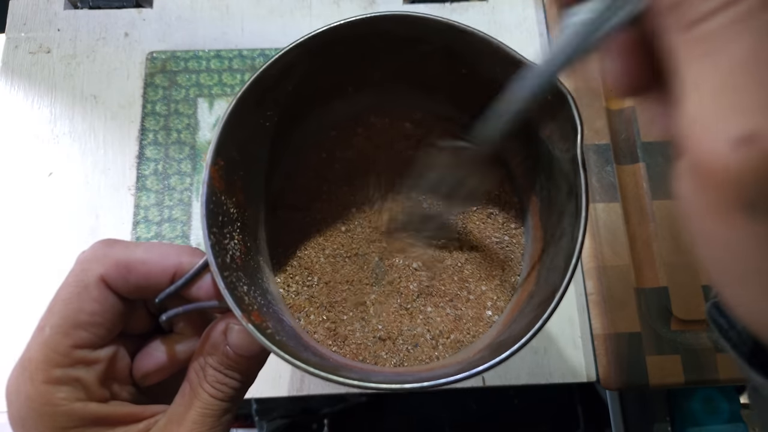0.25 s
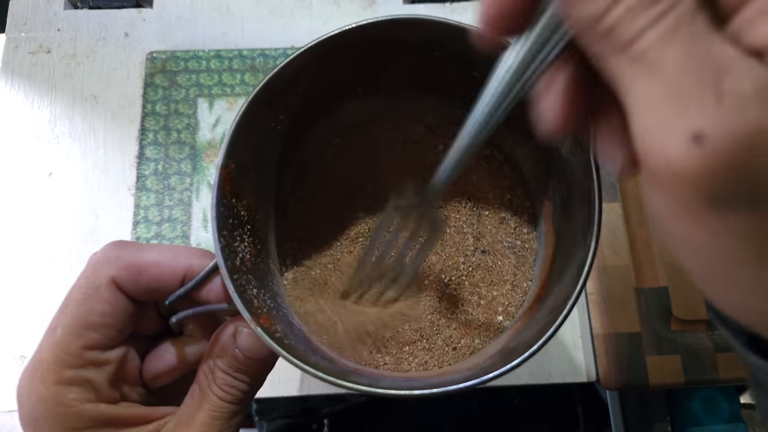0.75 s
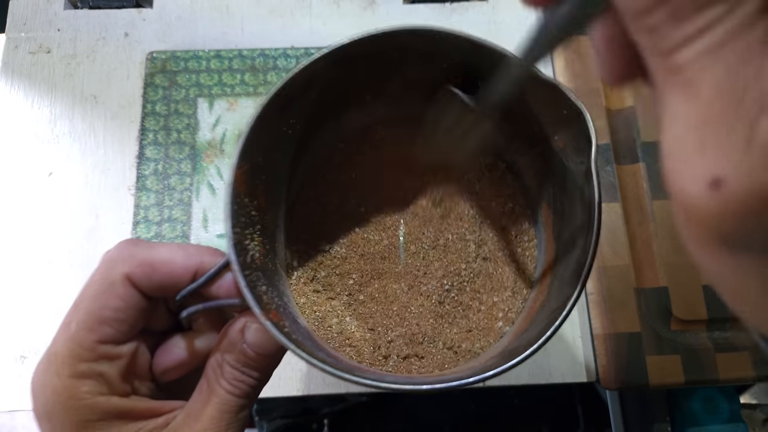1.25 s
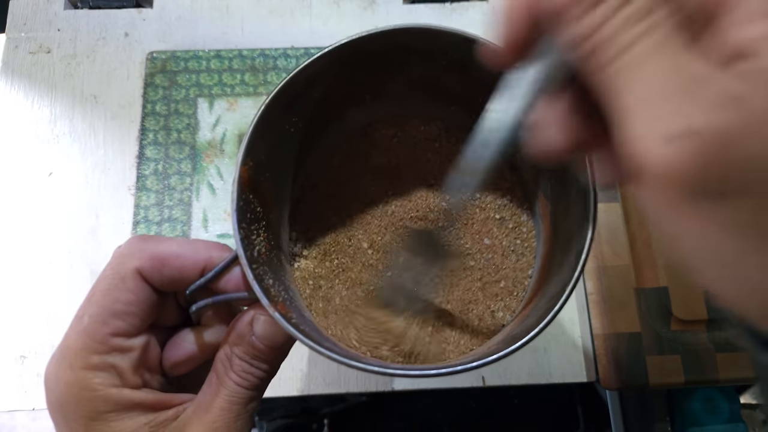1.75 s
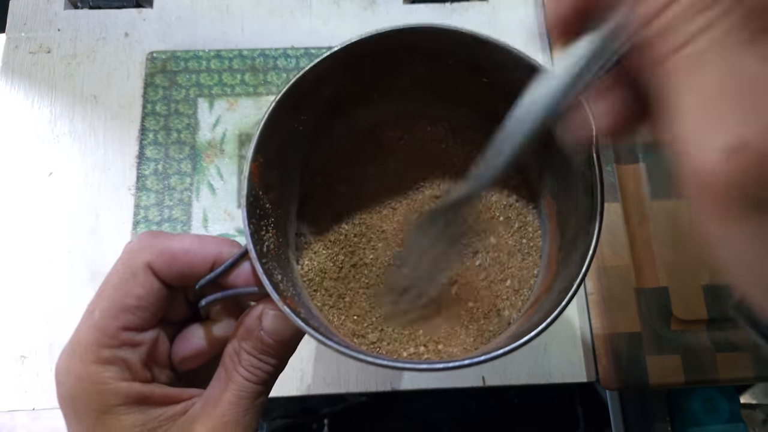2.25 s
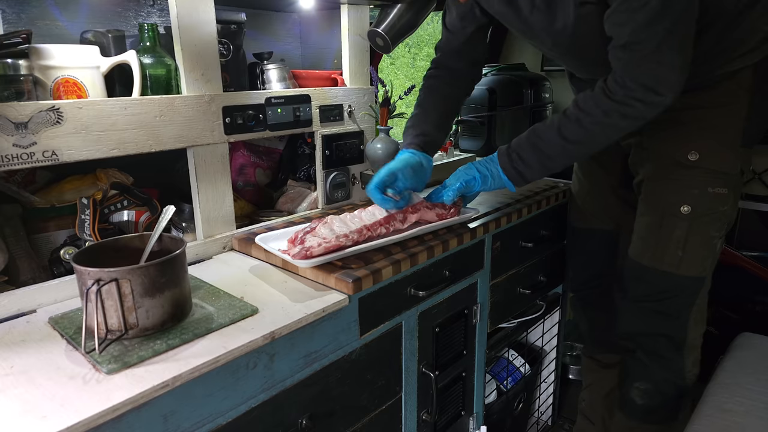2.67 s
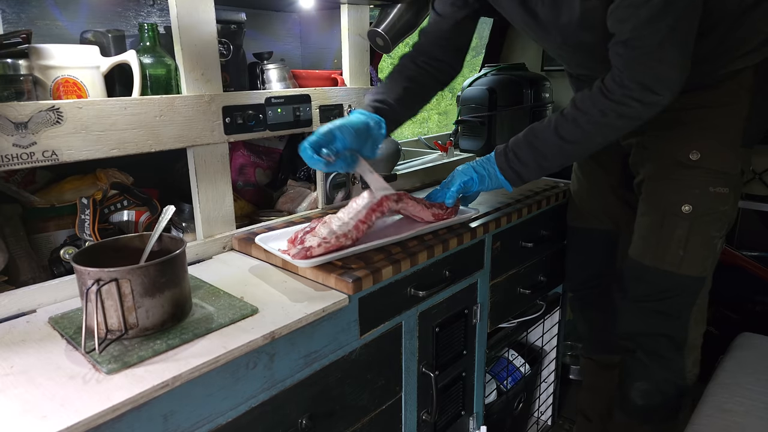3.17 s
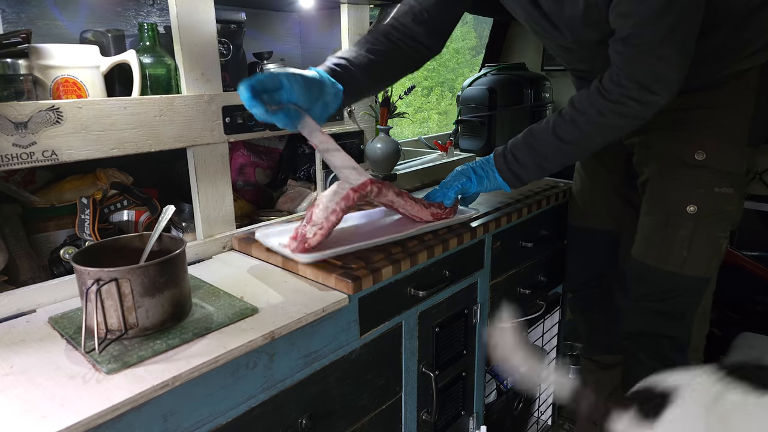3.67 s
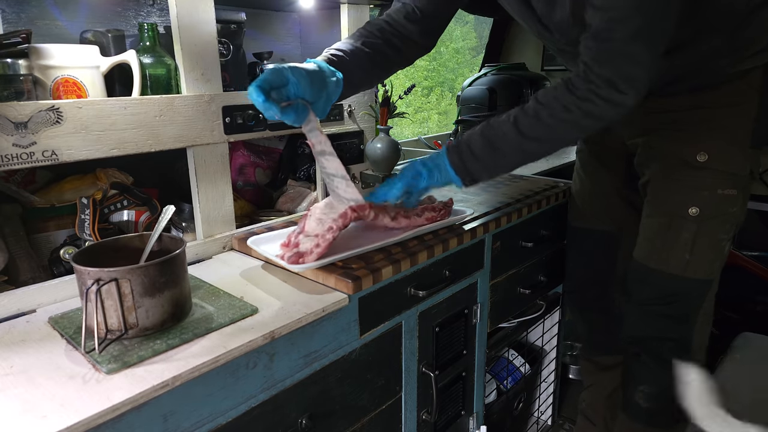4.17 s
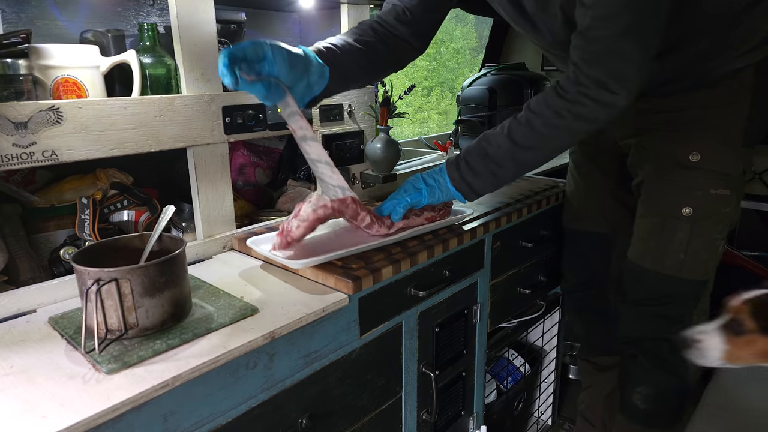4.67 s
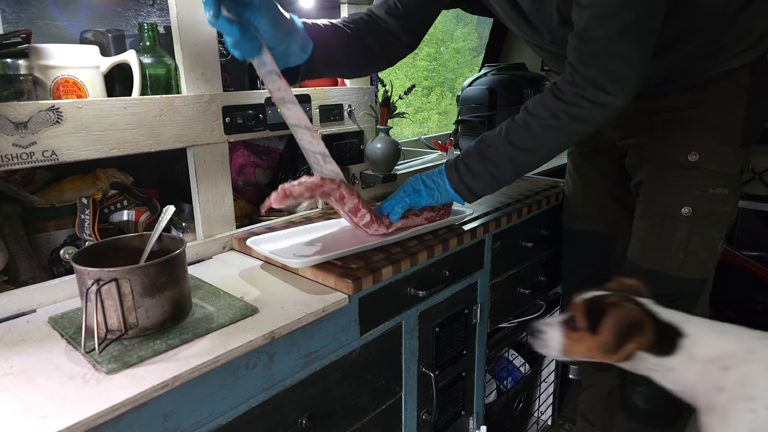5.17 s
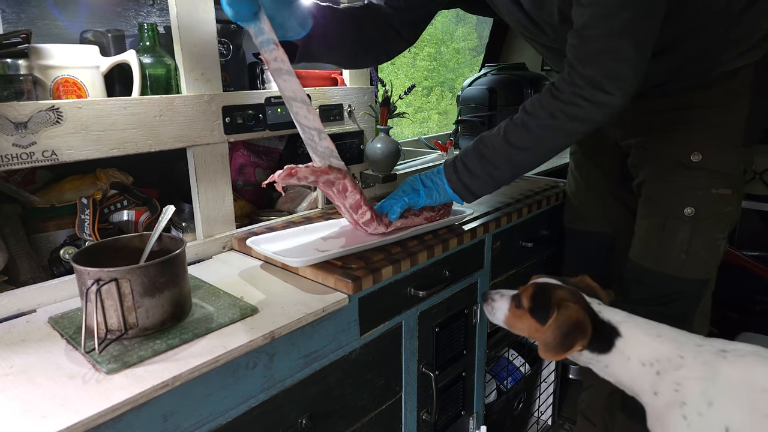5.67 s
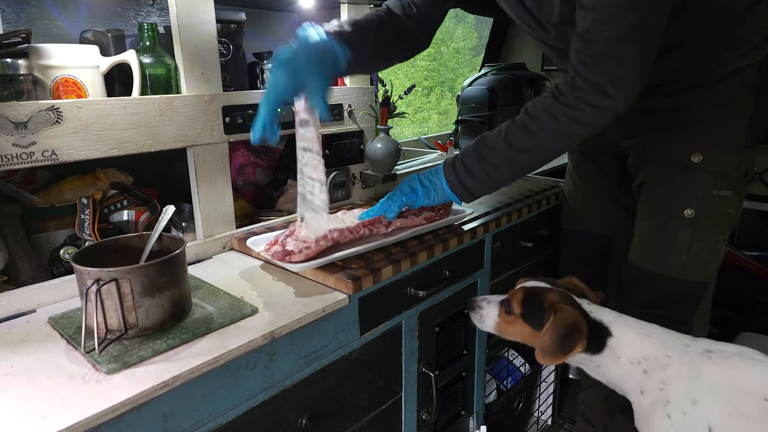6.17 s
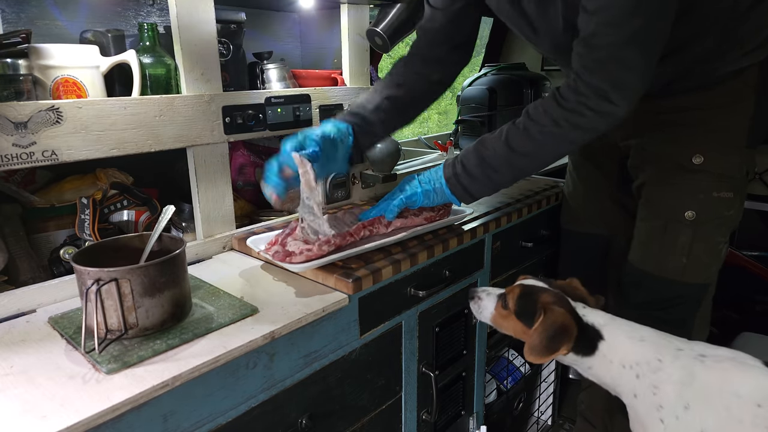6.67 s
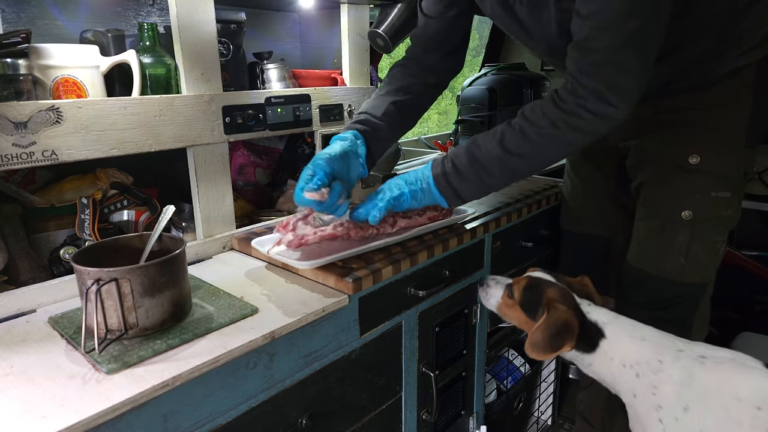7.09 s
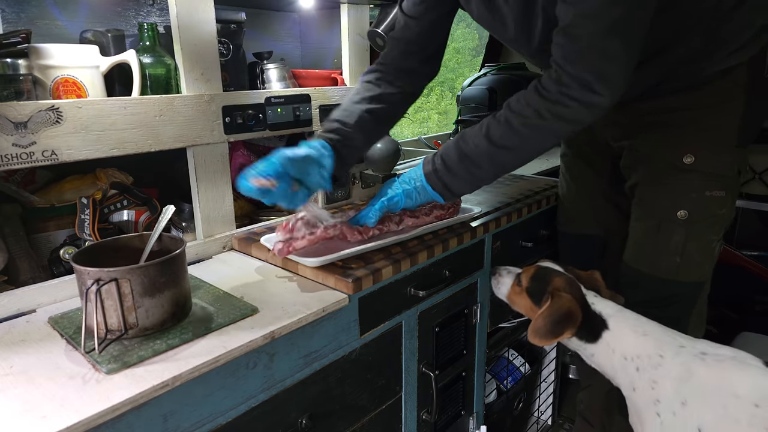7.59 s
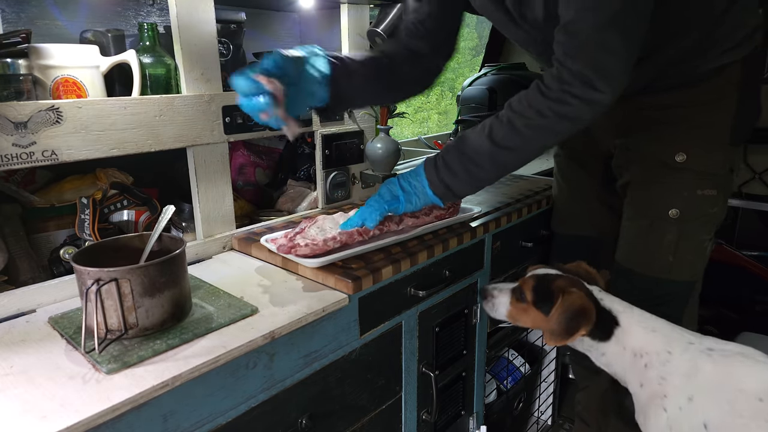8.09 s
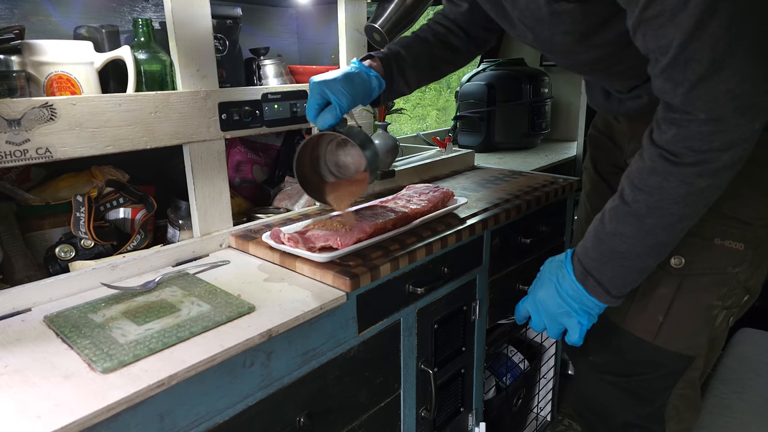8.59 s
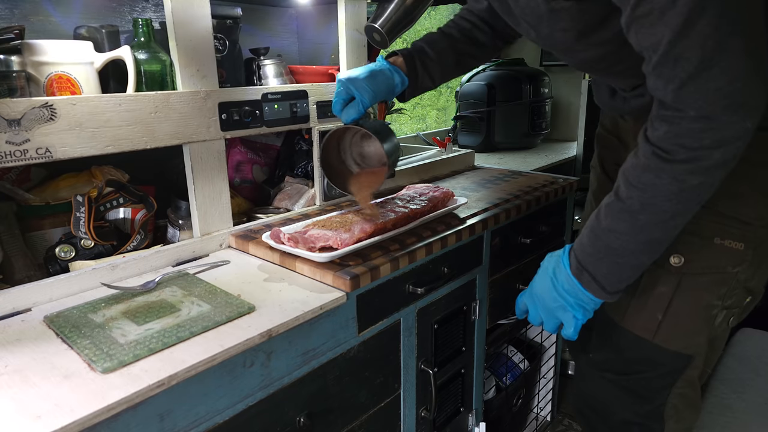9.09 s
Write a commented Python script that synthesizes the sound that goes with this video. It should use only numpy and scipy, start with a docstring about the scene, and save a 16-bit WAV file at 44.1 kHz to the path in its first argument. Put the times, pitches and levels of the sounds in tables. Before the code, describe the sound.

Close by, a fork stirs dry spices in a thin steel pot, the grains hissing and the tines knocking with a hollow ring. A little farther off, membrane is peeled from raw ribs in four pulls of tiny wet snaps. Gloves rustle, meat slaps a foam tray and the counter thuds softly. Finally spice is shaken out faintly, all over the low hum of a small cabin.

```python
"""Over the faint hum of a small cabin, a fork stirs dry spices in a thin steel pot, close by: grains hiss,
and the tines judder and knock, booming the pot and ringing its wall. At 2.3 s the scene changes to a
counter farther off, where a gloved hand peels the membrane from a rack of ribs in four pulls of tiny
wet snaps. Glove and meat rustle and slap on a foam tray, and the counter thuds beneath them.
From 8.5 s spice is shaken over the meat, its grains sliding across the pot's steel lip."""
import sys
import numpy as np
from scipy import signal
from scipy.fft import rfft, irfft
from scipy.io import wavfile
from scipy.ndimage import uniform_filter1d

SR = 44100
rng = np.random.default_rng(int(sys.argv[2]) if len(sys.argv) > 2 else 0)


def log_audio(samples):
    """Write samples as a 16-bit WAV file to the path given in sys.argv[1]."""
    # one column per channel
    frames = np.atleast_2d(samples).T
    # limit to full scale, then quantise
    limited = np.clip(frames, -1, 1)
    pcm = np.round(limited * 32767).astype(np.int16)
    wavfile.write(sys.argv[1], SR, pcm)


N = 411894
T = np.arange(N) / SR
POT_END_S = 2.343  # the pot scene gives way to the counter


def amp(db):
    return 10 ** (np.asarray(db) / 20)


def unit_rms(x):
    return x / np.sqrt(np.mean(x ** 2) + 1e-20)


def curve_at(points, hz):
    """Reads a curve along a log frequency axis."""
    point_hz, value = np.transpose(points)
    return np.interp(np.log(hz + 1), np.log(point_hz + 1), value)


def add(mix, start_s, sound):
    part = mix[max(round(start_s * SR), 0):][:len(sound)]
    part += sound[:len(part)]


def eq(x, gain):
    """Filters x by a gain given as a function of frequency."""
    return irfft(rfft(x) * gain(np.fft.rfftfreq(x.shape[-1], 1 / SR)), x.shape[-1])


def highpass(x, corner_hz, steepness):
    return eq(x, lambda hz: 1 / (1 + (corner_hz / (hz + 1)) ** steepness))


def resonate(x, hz, width):
    """A resonance of gain 1 at hz, which may be a curve."""
    turn = np.exp(2j * np.pi * np.cumsum(hz * np.ones(len(x))) / SR)
    pole = np.exp(-np.pi * width / SR)
    return 2 * (turn * signal.lfilter([1 - pole], [1, -pole], x / turn)).real


def grit(per_s, spread_db, clump_db, clump_s):
    """Random clicks of uneven size that come in clumps."""
    size = amp(spread_db * np.minimum(rng.exponential(1, N), 4)) * rng.choice([-1., 1.], N)
    span = int(clump_s * SR)
    clumps = unit_rms(uniform_filter1d(uniform_filter1d(rng.standard_normal(N), span), span))
    return unit_rms(size * (rng.random(N) < per_s / SR)) * unit_rms(amp(clump_db * clumps))


def swell(start, end, edge_s):
    """A hump from start to end with soft edges, beginning edge_s early."""
    t = np.arange(start - edge_s, end + edge_s, 1 / SR)
    past_plateau = np.maximum(abs(t - (start + end) / 2) - (end - start) / 2 + edge_s, 0)
    return np.exp(-(past_plateau / edge_s) ** 2)


def in_room(x, lag_s, lean_left, flicker_db, room_db):
    """Near walls answer briefly, hands shift the colour; the far side is late, its treble scattered."""
    t = np.arange(SR // 8) / SR
    echoes = rng.choice([-1., 1.], len(t)) * (rng.random(len(t)) < .1) * amp(-60 * t / 0.05) * (t > .002)
    room = amp(room_db) * signal.oaconvolve(x, echoes / np.linalg.norm(echoes))[:N]
    hz, _, near = signal.stft(x + room, SR, nperseg=128)
    flicker, turns = rng.standard_normal(near.T.shape).T, rng.random(near.T.shape).T
    near = near * amp(flicker_db * unit_rms(uniform_filter1d(uniform_filter1d(flicker, 2, 0), 44, 1)))
    scatter = 1 / (1 + (1700 / (hz[:, None] + 1)) ** 3)
    diffuse = np.sqrt(2 * scatter) * np.exp(2j * np.pi * turns)  # random phases halve in power on overlap
    far = near * (np.sqrt(1 - scatter) * np.exp(-2j * np.pi * hz[:, None] * lag_s) + diffuse)
    pan = amp(lean_left / 2 * (1.5 - scatter))
    return signal.istft(np.array([near * pan, far / pan]), SR, nperseg=128)[1][:, :N]


# Room tone EQ: (frequency [Hz], gain [dB])
AIR_EQ = [(12, -32), (20, -3), (70, 1), (192, -18), (284, -13.5), (469, -24), (620, -14.5), (1210, -26.5),
          (5950, -37.5), (7230, -32), (8550, -35), (10100, -55.5), (13700, -46.5), (15800, -66)]
# Stereo image of the room tone: (frequency [Hz], left-right correlation [-1..1])
AIR_IMAGE = [(60, 1), (240, 0.71), (950, -0.44), (3770, -0.053), (15000, 0.96)]


def cabin_air():
    """A bed of steady air whose colour drifts in patches."""
    frames, hz = N // 512 + 5, np.fft.rfftfreq(2048, 1 / SR)
    frame_s = np.arange(frames) * 512 / SR
    left_re, left_im, side_re, side_im, drift = rng.standard_normal((frames, 1025, 5)).T
    drift = unit_rms(uniform_filter1d(uniform_filter1d(drift, 20, 0), 8, 1))
    likeness = np.clip(curve_at(AIR_IMAGE, hz), -1, 1)[:, None]
    left = left_re + 1j * left_im
    right = likeness * left + np.sqrt(1 - likeness ** 2) * (side_re + 1j * side_im)
    gain_db = curve_at(AIR_EQ, hz)[:, None] + 1.5 * drift
    rumble, hiss = (hz > 45) & (hz < 110), hz > 1400
    gain_db -= 4 * np.outer(rumble | hiss, frame_s < POT_END_S)  # both are fainter by the pot
    gain_db -= 3.5 * np.outer(hz > 1500, frame_s > 8.4)  # the hiss drops at 8.4 s
    air = signal.istft(np.array([left, right]) * amp(gain_db), nperseg=2048, noverlap=1536)[1][:, :N]
    return amp(-59.5) * unit_rms(air)


# Fan drone: (pitch [Hz], width [Hz], level [dB], trim by the pot [dB])
FAN_TONES = [(64.4, 48, -64.5, -10.5), (273.9, 7.4, -75.5, -2.5)]


def fan():
    """Two fuzzy, wavering fan tones."""
    noise = rng.standard_normal(N)
    return sum(amp(db + trim_db * (T < POT_END_S)) * unit_rms(resonate(resonate(noise, hz, w), hz, w))
               for hz, w, db, trim_db in FAN_TONES)


# Low thuds under the work: (time [s], peak [dB], pitch [Hz])
COUNTER_THUDS = [(1.458, -49.5, 123), (2.037, -43, 135), (3.067, -41.5, 77), (3.099, -32.5, 80.4),
                 (3.294, -35.5, 75), (3.364, -36.5, 75.5), (3.367, -45.5, 356), (3.518, -44, 87),
                 (3.506, -47, 390), (3.997, -43.5, 74.4), (4.281, -42, 70.4), (6.095, -37.5, 196),
                 (6.086, -47.5, 468), (6.265, -53, 416), (6.28, -54.5, 425), (7.8106, -30, 126),
                 (7.795, -38, 480), (7.812, -39, 221), (7.821, -34.5, 77.7)]


def counter_thuds(t60_cycles=10.2):
    """A soft push sets the counter swinging for a few cycles; a fainter, higher panel mode rings along with it."""
    out, t = np.zeros(N), np.arange(SR // 3) / SR
    for start, db, hz in COUNTER_THUDS:
        envelope = (1 - np.exp(-(t * hz / 0.61) ** 2)) * amp(-60 * t * hz / t60_cycles)
        panel = amp(-12.5 - 60 * t / 0.13) * np.sin(2 * np.pi * 2.3 * hz * t)
        add(out, start, amp(db) * envelope / envelope.max() * (np.sin(2 * np.pi * hz * t) + panel))
    return out


# Shakes of the pot: (start [s], level [dB])
SPICE_SHAKES = [(8.479, -67), (8.572, -69.5), (8.717, -69.5), (8.803, -73), (8.947, -73.5), (9.05, -63.5),
                (9.174, -58.5), (9.28, -57)]
# Sandy EQ of the sliding spice: (frequency [Hz], gain [dB])
SHAKE_EQ = [(1180, -50.5), (2000, -19), (3740, -13.5), (4140, -5), (13200, -9), (15500, -8)]


def spice_shakes(length_s=0.068):
    """Dry grains slide to and fro over the steel lip."""
    level = np.zeros(N)
    for start, db in SPICE_SHAKES:
        add(level, start - .025, amp(db) * swell(start, start + length_s, edge_s=0.023))
    grains = grit(per_s=21000, spread_db=4.0, clump_db=0.0, clump_s=0.0033)
    return level * unit_rms(eq(grains, lambda hz: amp(curve_at(SHAKE_EQ, hz))))


# Wet hits on the tray: (time [s], peak [dB], centre [Hz])
TRAY_SLAPS = [(2.49, -47, 2100), (2.867, -34, 1660), (4.027, -53, 1380), (6.064, -35, 1380),
              (6.071, -41.5, 1000), (6.095, -36, 1400), (6.155, -55, 899), (6.395, -55, 2000),
              (6.915, -51.5, 2160), (7.417, -49.5, 2720), (7.498, -50.5, 1506), (7.686, -38.5, 1940),
              (7.796, -36.5, 2560), (7.813, -38.5, 1500), (8.155, -54.5, 1400)]


def tray_slaps(t60_s=0.046):
    """Meat and gloves slap the tray: a sharp click, then a short, broad, wet crack."""
    out, t = np.zeros(N), np.arange(4000) / SR
    for start, db, hz in TRAY_SLAPS:
        crack = unit_rms(resonate(rng.standard_normal(len(t)), hz, 0.48 * hz)) * amp(-60 * t / t60_s)
        click = amp(6.5 - 60 * t / 0.0023) * np.sin(2 * np.pi * 1.37 * hz * t)
        slap = crack - click
        add(out, start, amp(db) * slap / abs(slap).max())
    return out


# Four pulls on the membrane, one envelope each: (time [s], level [dB])
MEMBRANE_PULLS = [
    [(2.38, -77), (2.494, -61.5), (2.504, -65.5), (2.69, -47), (2.822, -44.5), (3.05, -66)],
    [(3.05, -64), (3.074, -53), (3.158, -43.5), (3.246, -54), (3.414, -49.5), (3.43, -45.5), (3.868, -50),
     (3.892, -59.5), (3.92, -87.5)],
    [(3.95, -74.5), (3.996, -48), (4.034, -46.5), (4.12, -80.5)],
    [(4.34, -74.5), (4.498, -48), (4.626, -51), (4.642, -47), (4.8, -52), (4.9, -48.5), (4.96, -54.5),
     (5.024, -58.5), (5.176, -50), (5.268, -66), (5.354, -56), (5.482, -64.5), (5.566, -56), (5.77, -74.5)],
]
# Tone of the tear, relative to the pull: (time [s], fizz [dB], body [dB])
TEAR_TONE = [(2.45, -12, -4), (2.629, -11.5, -27.5), (2.799, -10.5, -8.5), (3.3, -0.5, -8), (4.8, 1, -11),
             (5.7, -3.5, -14.5)]
# Short rustles of glove and meat: (start [s], end [s], level [dB], relative body [dB])
GLOVE_RUSTLES = [(4.077, 4.086, -56.5, -12), (4.216, 4.327, -68.5, -6), (5.786, 5.847, -61, -9.5),
                 (6.078, 6.123, -60, -3), (6.118, 6.24, -68.5, -8), (6.509, 6.596, -64, -12),
                 (6.691, 6.765, -68.5, -9.5), (6.805, 6.88, -65.5, -8), (6.898, 6.963, -71, -11),
                 (7.032, 7.166, -64.5, -3.5), (7.152, 7.333, -57, -9.5), (7.405, 7.433, -65.5, -3.5),
                 (7.546, 7.66, -68, -14), (7.616, 7.707, -54.5, -8), (7.795, 7.817, -56, -0.5),
                 (7.86, 8.038, -69.5, -4), (8.137, 8.213, -69, -7.5)]


def hand_envelopes():
    """Mid, fizz and body levels of the pulls and rustles, varying with the grip."""
    pull = sum(amp(np.interp(T, *np.transpose(curve), -120, -120)) for curve in MEMBRANE_PULLS)
    times, *tone_db = np.transpose(TEAR_TONE)
    levels = [pull] + [pull * amp(np.interp(T, times, db)) for db in tone_db]
    for start, end, db, body_db in GLOVE_RUSTLES:
        fizz_db = -16.5 - 1.61 * body_db  # the fuller a rustle, the less it fizzes
        edge_s = 0.5 * (end - start)
        for level, band_db in zip(levels, (db, db + fizz_db, db + body_db)):
            add(level, start - edge_s, amp(band_db) * swell(start, end, edge_s))
    return levels


# EQ of the snapping fibres: (frequency [Hz], gain [dB])
FIBRE_EQ = [(240, -35), (400, -19.5), (928, -14.5), (1320, -12.5), (1790, -7.5), (2400, -1), (2750, -3),
            (3110, 2), (7790, 1.5), (9650, -14), (15500, -10.5)]
# Resonances of the foam tray: (centre [Hz], width [Hz], gain [dB])
TRAY_MODES = [(1356, 130, -0.5), (2100, 200, -6.5), (7980, 820, -6)]
# Taut strips rasping loose: (middle [s], length [s], level [dB], centre [Hz], width [Hz])
STRIP_RASPS = [(4.438, 0.033, -60.5, 1240, 250), (4.826, 0.4, -64, 1250, 200),
               (7.091, 0.084, -69, 2900, 600), (7.241, 0.13, -61, 2850, 400)]


def peeling():
    """Wet fibres part in dense tiny snaps, coloured by tray modes that the hand damps or frees."""
    clicks = grit(per_s=20000, spread_db=2.5, clump_db=1.24, clump_s=0.023)
    snaps = eq(clicks, lambda hz: amp(curve_at(FIBRE_EQ, hz)))
    grips = uniform_filter1d(rng.standard_normal((len(TRAY_MODES), N)), SR // 4, axis=1)
    snaps = snaps + sum(amp(db + 2.6 * unit_rms(grip)) * resonate(snaps, hz, width)
                        for (hz, width, db), grip in zip(TRAY_MODES, grips))
    body = eq(snaps, lambda hz: 1 / (1 + (hz / 1900) ** 8))
    fizz = highpass(snaps, 9200, steepness=16)
    mid = snaps - body - fizz
    out = sum(unit_rms(band) * level for band, level in zip((mid, fizz, body), hand_envelopes()))
    for middle, length, db, hz, width in STRIP_RASPS:
        envelope = amp(db) * np.exp(-(2 * (T - middle) / length) ** 4)
        out += envelope * unit_rms(resonate(snaps, hz, width))
    return out


# Modes of the pot's wall: (pitch [Hz], gain [dB], 60 dB decay [s])
WALL_MODES = [(1883, -5, 0.029), (2350, -3, 0.064), (3570, -5, 0.047), (4640, -2, 0.029),
              (5640, -7.5, 0.049), (8630, -14, 0.025), (12160, 4, 0.0081), (14700, -9.5, 0.012)]


def wall_ring(x):
    """The steel wall rings briefly, damped by the spice."""
    t = np.arange(3000) / SR
    ring = sum(amp(db - 60 * t / t60) * np.sin(2 * np.pi * hz * t) for hz, db, t60 in WALL_MODES)
    return signal.oaconvolve(x, ring / np.linalg.norm(ring))[:N]


# EQ of spice on steel: (frequency [Hz], gain [dB])
SPICE_EQ = [(710, -40.5), (1200, -13), (1440, -17.5), (1880, -4.5), (2860, -11.5), (3610, -7), (7980, -9),
            (10900, -21), (13600, -5.5), (15500, -11)]


def spice_spray(x):
    """Gives x the bright, dry colour of grains striking steel."""
    return eq(x, lambda hz: amp(curve_at(SPICE_EQ, hz)))


# Hollow tones of the pot's air and base: (centre [Hz], width [Hz], gain [dB])
POT_MODES = [(714, 95, 5), (967, 340, -1.5), (600, 110, -9.5), (1170, 860, -10.5)]


def pot_scrape(wander=0.016, wander_s=0.05):
    """Tines judder over the base; the pot's pitch drifts as fork and spice shift inside it."""
    judder = grit(per_s=800, spread_db=1.5, clump_db=3.5, clump_s=0.0078)
    out = np.zeros(N)
    for hz, width, db in POT_MODES:
        drift = unit_rms(uniform_filter1d(rng.standard_normal(N), int(wander_s * SR)))
        pitch = hz * (1 + wander * drift)
        out += amp(db) * resonate(resonate(judder, pitch, width), pitch, width)
    return unit_rms(out)


# Fork strokes, with boom and treble sheen relative to the hiss:
# (start [s], end [s], opening hiss [dB], closing hiss [dB], boom [dB], sheen [dB])
FORK_STROKES = [(0.007, 0.063, -64.5, -41, 6, -2), (0.038, 0.093, -50, -52, 2, -2),
                (0.219, 0.254, -65, -49, -3, 14), (0.235, 0.321, -47, -50, 1, -3),
                (0.334, 0.407, -44.5, -64.5, -9, -3), (0.418, 0.462, -37, -78, -16, 7.5),
                (0.457, 0.508, -51, -34, -4.5, -7), (0.512, 0.582, -41, -68, -5, 1),
                (0.579, 0.65, -39.5, -45.5, 1.5, 3), (0.69, 0.731, -69, -73, -32, 18),
                (0.742, 0.81, -71.5, -79, 4, 26.5), (0.793, 0.847, -45.5, -41.5, 4.5, 1.5),
                (0.856, 0.892, -52, -61, -8, 7), (0.909, 0.946, -34, -47, 1, -1),
                (0.967, 1.03, -42, -44, 0.5, 1), (1.076, 1.139, -52, -70.5, 1.5, -3),
                (1.129, 1.202, -37, -53.5, -6, -1), (1.31, 1.474, -49.5, -42, -1.5, -4.5),
                (1.48, 1.627, -51, -62, -4.5, 3.5), (1.603, 1.712, -45.5, -51, -4, 1.5),
                (1.771, 1.838, -60.5, -61, -6, 21), (1.845, 1.9, -54, -36.5, 0.5, -4),
                (1.9, 1.983, -39.5, -61, -2.5, 0), (2.019, 2.086, -59, -51, -4, 13.5),
                (2.099, 2.186, -51.5, -47.5, -2, -2.5), (2.174, 2.24, -61.5, -48.5, -2, 3)]


def stirring(attack_s=0.0066, boom_attack_s=0.011, release_db_per_s=1597, settle_s=0.059):
    """Each stroke hisses grains against steel and booms the pot; the finest grains then trickle back."""
    hiss, boom = amp(-77.0) * (T < POT_END_S), np.zeros(N)  # grains keep settling between strokes
    sheen = hiss.copy()
    for start, end, first_db, last_db, boom_db, sheen_db in FORK_STROKES:
        t = np.arange(start, end + .04, 1 / SR)
        level_db = np.interp(t, [start, end], [first_db, last_db])
        level = amp(level_db - release_db_per_s * np.maximum(t - end, 0))
        level *= np.minimum((t - start) / attack_s, 1)
        add(hiss, start, level)
        add(sheen, start, level * amp(sheen_db))
        add(boom, start, level * amp(boom_db) * np.minimum((t - start) / boom_attack_s, 1))
    clicks = grit(per_s=4500, spread_db=4.5, clump_db=1.53, clump_s=0.0066)
    grains = unit_rms(spice_spray(clicks)) + amp(-7.0) * unit_rms(wall_ring(clicks))
    top = highpass(grains, 7000, steepness=4)
    fine = unit_rms(highpass(grains[::-1], 7500, steepness=6))
    pole = np.exp(-1 / (settle_s * SR))
    trickle = amp(-14) * signal.lfilter([1 - pole], [1, -pole], sheen) * fine
    return hiss * (grains - top) + sheen * top + trickle + boom * pot_scrape()


# Tine hits on the pot: (time [s], boom level [dB], boom pitch [Hz], tick level [dB])
FORK_KNOCKS = [(0.028, -37, 770, -46), (0.051, -26.5, 777, -29.5), (0.105, -40.5, 745, -43),
               (0.247, -12, 857, -23), (0.252, -23, 750, -21), (0.358, -36, 720, -41),
               (0.421, -46, 720, -47), (0.467, -34, 760, -50), (0.487, -28, 820, -38),
               (0.508, -25, 743, -52), (0.515, -24, 790, -46), (0.587, -30.5, 870, -32),
               (0.596, -34, 750, -41), (0.608, -34, 734, -36), (0.623, -26.5, 980, -35.5),
               (0.7, -61, 604, -39), (0.805, -40, 970, -36.5), (0.821, -25.5, 790, -56),
               (0.841, -28.5, 734, -31), (0.847, -26.5, 805, -33), (0.915, -25.5, 770, -45),
               (0.973, -23, 920, -38), (0.987, -16.5, 780, -27), (1.082, -31, 830, -40),
               (1.092, -65, 877, -33), (1.139, -18, 832, -51), (1.257, -29, 754, -40),
               (1.324, -35.5, 770, -64), (1.355, -28.5, 834, -37), (1.385, -37, 780, -46),
               (1.419, -32.5, 930, -50), (1.454, -35, 850, -50), (1.463, -26.5, 702, -58),
               (1.612, -35, 880, -34), (1.635, -45, 820, -50), (1.685, -50, 760, -40),
               (1.803, -53, 1490, -40), (1.892, -29.5, 760, -40), (1.925, -32.5, 720, -37.5),
               (2.04, -30.5, 690, -31), (2.062, -53, 770, -23.5), (2.136, -32, 750, -35.5),
               (2.145, -30, 786, -45), (2.185, -44, 780, -39), (2.333, -62, 726, -39.5)]


def fork_knocks(overtone_ratio=1.3, glance_db=26):
    """Each blow: a few cycles of the pot's boom with a soft attack, and a tick that shakes the wall."""
    (boom, tick, glance), t = np.zeros((3, N)), np.arange(2000) / SR
    envelope = (1 - np.exp(-(t / 0.0024) ** 2)) * (amp(-60 * t / 0.015) + amp(-21.0 - 60 * t / 0.014))
    burst = np.minimum(t / 0.00045, 1) * (amp(-60 * t / 0.0014) + amp(-8.0 - 60 * t / 0.037))
    for start, boom_db, hz, tick_db in FORK_KNOCKS:
        noise = rng.standard_normal(len(t))
        overtone = amp(-10) * np.sin(2 * np.pi * overtone_ratio * hz * t + noise[0])
        add(boom, start, amp(boom_db) * envelope / envelope.max() * (np.sin(2 * np.pi * hz * t) + overtone))
        glancing = np.clip((tick_db - boom_db) / glance_db, 0, 1)  # at 1, a glancing blow: all treble
        add(tick, start, amp(tick_db) * np.sqrt(1 - glancing) * burst * noise)
        add(glance, start, amp(tick_db) * np.sqrt(glancing) * burst * noise)
    tick += amp(4.5) * highpass(glance, 5000, steepness=2)
    return boom + amp(17.5) * spice_spray(tick) + amp(0.1) * wall_ring(tick)


def scene():
    """The close pot, then the roomier ribs, over the cabin's bed."""
    pot = in_room(stirring() + fork_knocks(), lag_s=0.00014, lean_left=2.5, flicker_db=2.0, room_db=-8.0)
    handwork = peeling() + tray_slaps() + spice_shakes()
    ribs = in_room(handwork, lag_s=0.00007, lean_left=3.0, flicker_db=2.05, room_db=-3.0)
    return pot * (T < POT_END_S) + ribs + counter_thuds() + cabin_air() + fan()


def record(dry):
    """A steep high cut at 15.85 kHz."""
    return signal.oaconvolve(dry, signal.firwin(511, 15850, window=("kaiser", 9), fs=SR)[None], "same")


dry = scene()
out = record(dry)
log_audio(out)
```